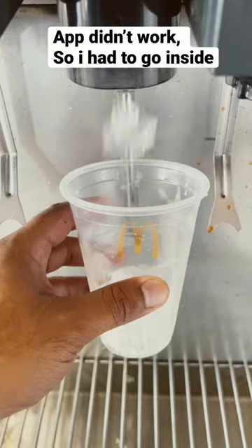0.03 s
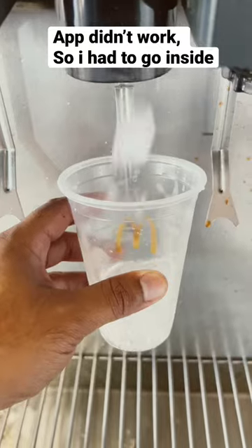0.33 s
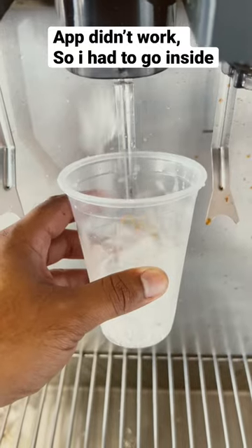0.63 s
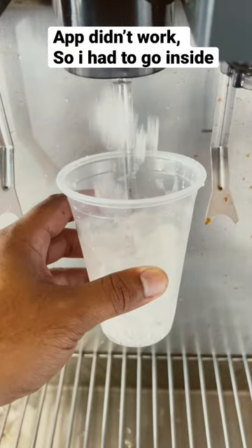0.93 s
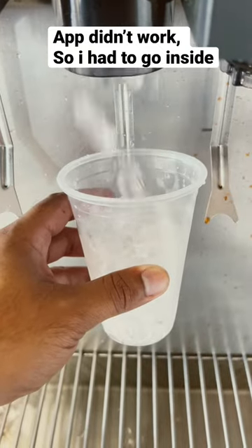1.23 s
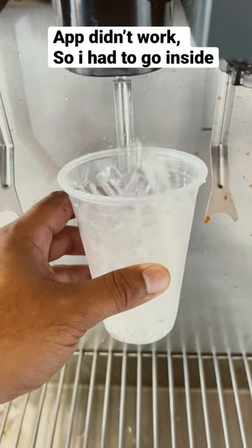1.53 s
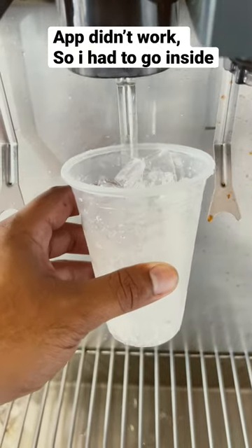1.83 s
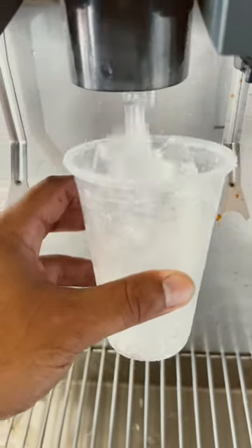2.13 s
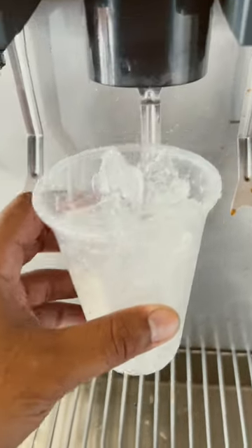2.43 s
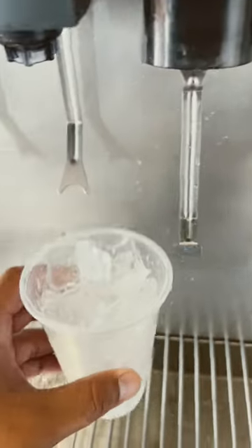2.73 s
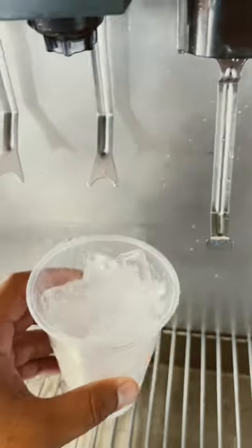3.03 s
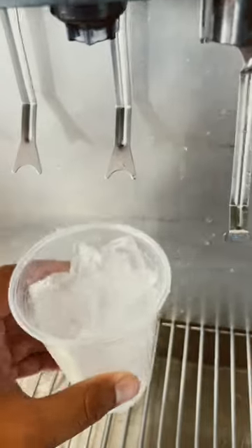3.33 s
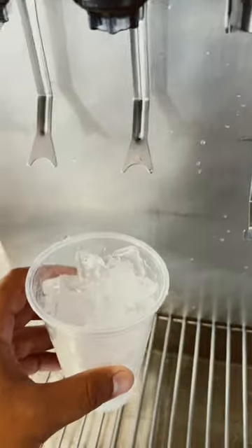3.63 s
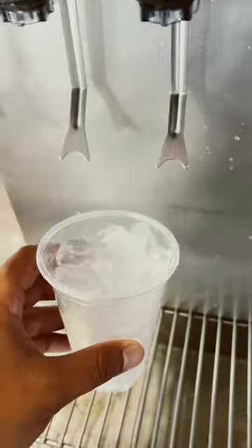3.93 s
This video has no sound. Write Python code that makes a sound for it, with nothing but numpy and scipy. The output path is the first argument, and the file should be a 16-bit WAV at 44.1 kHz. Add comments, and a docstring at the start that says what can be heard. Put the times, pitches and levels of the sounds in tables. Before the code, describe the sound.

Ice cubes clatter into a plastic cup close by from the start, with hollow knocks and bright clinks over a low dispenser motor hum. The motor stops at about 2 seconds and the ice settles by 2.4. The cup is shaken at about 2.9, 3.4 and 3.8 seconds, the cubes crunching and knocking its wall, the middle shake softer. A faint kitchen rumble runs underneath.

```python
"""In a kitchen, a dispenser motor hums while ice cubes tumble down a chute into a plastic cup nearby.
The motor stops, the ice settles, and the cup is shaken three times: the cubes slide, knock the wall
and crunch back. Each touch of ice is a tiny burst of noise, and hard knocks make the cup ring.
The machine's steel recess throws back quick echoes, and the kitchen rumbles behind it all."""
import sys
import numpy as np
from scipy import signal
from scipy.fft import rfft, irfft
from scipy.io import wavfile

SR = 44100
rng = np.random.default_rng(int(sys.argv[2]) if len(sys.argv) > 2 else 0)


def unload_audio(sound):
    """Save the sound as a 16-bit wav file, at the path given as the first command line argument."""
    columns = np.transpose(np.atleast_2d(sound))
    # keep every value between -1 and 1, then stretch to whole-number steps
    steps = np.round(np.clip(columns, -1, 1) * 32767)
    wavfile.write(sys.argv[1], SR, steps.astype(np.int16))


N = 176400
TIME, HZ = np.arange(N) / SR, np.fft.rfftfreq(N, 1 / SR)
MOTOR_ON_S, MOTOR_OFF_S, MOTOR_RISE_S = 0.035, 1.955, 0.0024

# how loudly small pieces of ice jostle during the pour: t/s, level/dB
JOSTLE_LEVELS = [(.036, -38.5), (.07, -43.5), (.09, -33), (.45, -26), (.57, -34.5), (.67, -28),
                 (.715, -36.5), (.88, -28.5), (1.28, -27), (1.4, -31), (1.63, -34.5), (1.72, -45),
                 (1.85, -42.5), (1.88, -34.5), (2.0, -37), (2.14, -30), (2.25, -33.5), (2.31, -47),
                 (2.7, -69)]


def cubes(touches_per_s=1100, first_touch=1.2):
    """Each cube chatters against plastic and other ice; every touch is a dry crack of its own."""
    # cube hits: t/s, hollow body/dB, clack/dB, bright clink/dB
    hits = [(0.077, -29, -27, -24.5), (0.094, -20.5, -20.5, -22.5), (0.138, -37, -19.5, -43),
            (0.15, -14, -24, -25), (0.225, -26.5, -26.5, -23), (0.236, -18, -20.5, -31),
            (0.257, -25, -21, -19.5), (0.305, -33, -25, -17.5), (0.367, -39, -21, -14),
            (0.39, -31, -30, -30), (0.446, -34, -21.5, -19), (0.484, -21, -16, -24),
            (0.507, -31, -25.5, -27), (0.585, -25, -26.5, -26.5), (0.596, -20.5, -24, -27),
            (0.624, -25, -30.5, -27), (0.647, -41, -28, -39), (0.726, -20, -20.5, -25.5),
            (0.741, -21, -39, -44), (0.759, -30, -22.5, -26.5), (0.806, -41, -25.5, -21),
            (0.873, -34, -23.5, -23), (0.886, -26, -21, -21), (0.906, -20.5, -23.5, -20),
            (0.964, -36, -26.5, -21), (1.017, -28, -18, -29), (1.073, -24.5, -22.5, -25),
            (1.112, -37, -31.5, -42), (1.148, -31.5, -23.5, -48), (1.224, -38, -25.5, -20.5),
            (1.337, -32, -24.5, -41), (1.354, -27.5, -24.5, -41), (1.466, -26, -22.5, -22),
            (1.502, -24.5, -27.5, -22.5), (1.54, -30.5, -28, -22.5), (1.611, -42, -33, -17),
            (1.631, -27.5, -31.5, -25), (1.742, -26, -25.5, -21.5), (1.752, -27, -27.5, -47),
            (1.809, -32, -28.5, -48), (1.826, -35.5, -33.5, -34), (1.873, -28, -22.5, -19.5),
            (1.888, -25, -22.5, -42), (1.95, -37, -23.5, -23), (1.958, -26.5, -23, -42),
            (2.024, -33, -23, -19), (2.038, -21, -19, -32), (2.055, -25, -23.5, -40),
            (2.074, -46, -22, -29), (2.116, -29, -22, -21.5), (2.131, -23.5, -23, -23),
            (2.19, -29, -35, -27), (2.38, -44.5, -49, -61), (2.598, -44, -47.5, -58),
            (3.032, -45, -36, -42), (3.403, -40, -33, -26.5), (3.424, -44, -35.5, -27)]
    # pitch ranges of body, clack and clink: low/Hz, high/Hz
    bands = [(450, 1400), (1400, 6000), (6000, 16500)]
    # their t60, the time to fade by 60 dB: one touch/s, whole chatter/s
    fades = [(0.029, 0.072), (0.021, 0.075), (0.013, 0.076)]
    # tone of the ice: f/Hz, level/dB
    tone = [(60, -10.5), (350, 1), (800, -4), (2500, 3.5), (4500, -2.5), (6500, 2.5), (16000, -5.5)]
    out, t = np.zeros((2, N)), np.arange(SR // 16) / SR
    filters = [signal.butter(2, band, "bandpass", fs=SR) for band in bands]
    for start, *levels in hits:
        touches = rng.exponential(1, len(t)) * (rng.random(len(t)) < touches_per_s / SR)
        touches[0] = first_touch ** 2
        for db, (b, a), (ring_s, chatter_s) in zip(levels, filters, fades):
            chatter = touches * fade(t, chatter_s) ** 2
            power = signal.lfilter([1], [1, -fade(1 / SR, ring_s) ** 2], chatter)  # each touch dies away
            cracks = np.sqrt(power) * burst(t, np.inf, wide=0.79)
            add(out, start, amp(db) * struck(signal.lfilter(b, a, cracks)))
    return colour(out, read(tone))


def knocks():
    """The whole load of ice hits the thin wall and makes the cup ring."""
    # blows on the wall: t/s, level/dB, brightness/(dB per octave)
    blows = [(0.149, -22, 0), (2.825, -37.5, -4), (2.942, -23, -2), (2.948, -14, -2), (2.951, -9, 2.5),
             (3.377, -21.5, -2), (3.775, -26, 0), (3.838, -13.5, 2), (3.844, -10, -3), (3.851, -9.5, 1)]
    # notes the filled cup rings at: f/Hz, level/dB, t60/s
    cup_notes = [(337, -14, 0.026), (632.5, -10, 0.12), (830, -12, 0.03), (980, -9.5, 0.033),
                 (1195, -5.5, 0.022), (1392, -11, 0.05), (1547, 1, 0.028), (1740, 3, 0.013),
                 (2506, 0.5, 0.025), (3130, -2.5, 0.015), (4060, -10.5, 0.034)]
    out, t = np.zeros((2, N)), np.arange(SR // 8) / SR
    hz, db, t60 = np.transpose(cup_notes)
    crack_band = signal.butter(1, [500, 3800], "bandpass", fs=SR, output="sos")
    for start, strength_db, tilt_db in blows:
        pitches = hz * (1 + 0.0095 * rng.standard_normal(len(hz)))
        gains = amp(db + tilt_db * np.log2(hz / hz.mean()) + rng.standard_normal(len(hz)))
        tone = ring(t, pitches, gains * rng.choice([-1, 1], len(hz)), t60)
        crack = signal.sosfilt(crack_band, rng.standard_normal((2, len(t)))) * fade(t, t60=0.054)
        add(out, start, amp(strength_db) * struck(struck(tone) + 0.58 * struck(crack)))
    return out


def pitched_hits(t60=0.05):
    """Short pitched hits: hollow thuds on the cup wall, then one faint ice clink."""
    # hits with a clear note: t/s, f/Hz, level/dB
    hits = [(0.277, 1084, -17.5), (.356, 844, -19.5), (.39, 980, -17.5), (.546, 747, -22), (.648, 720, -18),
            (.666, 615, -23), (.68, 753, -24.5), (.88, 814, -20), (2.371, 2370, -39)]
    out, t = np.zeros((2, N)), np.arange(SR // 12) / SR
    for start, hz, db in hits:
        note = np.sin(2 * np.pi * hz * t) * fade(t, t60)
        impact = signal.lfilter(*signal.iirpeak(hz, 1, fs=SR), burst(t, t60, wide=0.63))
        add(out, start, amp(db) * struck(note + 0.5 * struck(impact)))
    return out


def snaps(ping_hz=8900):
    """A cube cracks: one very short bright click with a high ring."""
    # cracks in the ice: t/s, level/dB
    cracks = [(.546, -24.5), (1.207, -18), (1.597, -21), (1.659, -15), (1.742, -25), (1.826, -25.5),
              (1.927, -27), (2.989, -20), (2.999, -23.5), (3.034, -36), (3.061, -36), (3.129, -47),
              (3.179, -37.5), (3.205, -49), (3.434, -28.5), (3.477, -45)]
    out, t = np.zeros((2, N)), np.arange(SR // 20) / SR
    for start, db in cracks:
        crack = burst(t, t60=0.006, wide=0.11)
        ping = signal.lfilter(*signal.iirpeak(ping_hz, 8, fs=SR), crack)
        click = signal.lfilter(*signal.butter(2, 5500, "highpass", fs=SR), crack)
        add(out, start, amp(db) * struck(struck(ping) + 2.2 * struck(click)))
    return out


def slide():
    """Cubes crunch over each other as the cup is shaken."""
    # one loudness curve for each shake: t/s, level/dB
    shakes = [
        [(2.82, -53), (2.89, -34.5), (2.94, -30), (2.975, -18.5), (3.015, -38), (3.11, -58)],
        [(3.31, -53), (3.36, -40.5), (3.41, -36), (3.45, -53), (3.5, -58)],
        [(3.715, -47.5), (3.74, -39), (3.79, -23.5), (3.825, -29), (3.85, -21.5), (3.9, -22.5), (3.94, -38.5),
         (4, -50)],
    ]
    # tone of sliding ice: f/Hz, level/dB
    tone = [(150, -14), (420, -2.5), (620, 0.5), (850, -8), (1700, 0), (3000, -4.5), (8500, -6.5),
            (16000, -16)]
    crunch = grains(tone, per_s=900, spread_db=0.5, t60=0.0098, wide=0.96)
    return sum(level(shake) for shake in shakes) * crunch


def jostle(wide):
    """Small pieces of ice bump together in a steady patter."""
    # tone of the pieces: f/Hz, level/dB
    tone = [(150, -15), (280, -5.5), (750, -4.5), (1250, -9), (2400, -4), (4200, -10), (6400, -8),
            (16000, -13.5)]
    return grains(tone, per_s=900, spread_db=3, t60=0.0082, wide=wide)


def roll(fall_db_per_s=6.5):
    """Cubes roll round the cup; the hollow rattle fades as it fills."""
    hollow = signal.lfilter(*signal.butter(2, [586, 1177], "bandpass", fs=SR), jostle(wide=0.99))
    return level(JOSTLE_LEVELS) * amp(-6.5 - fall_db_per_s * TIME) * unit(hollow)


def chute(x, sharpness=18.8):
    """The chute and recess boost the pitches they ring at."""
    # boosted pitches: f/Hz, boost/dB
    peaks = [(630, 2.3), (930, 6.3), (1066, 7.2), (1362, 3.9), (1580, 7), (1745, 0.37), (2520, 1.6)]
    return colour(x, sum(db / (1 + (2 * sharpness * (HZ / hz - 1)) ** 2) for hz, db in peaks))


def recess(x, echo_sets=7, drawn_out_s=2.3):
    """Quick, ever-shifting echoes off the steel walls weaken as the cup is drawn out."""
    echo_set = np.arange(N) // (SR // 40) % echo_sets  # the next set every 25 ms
    sent = x * amp(-7 * np.clip((TIME - drawn_out_s) / 0.5, 0, 1))
    return sum(echoes(sent * (echo_set == k), t60=0.043, delay_s=0.0008, per_s=2500)
               for k in range(echo_sets))


def motor(hum_hz=120.2, sag_db_per_s=1.0):
    """Electric hum and gear rumble start and stop quickly; a weak boom lingers in the room."""
    # tone of the gears: f/Hz, level/dB
    gear_tone = [(30, -33), (70, -16.5), (130, -7), (230, 2.5), (600, -16.5), (1500, -31)]
    since_off = np.maximum(TIME - MOTOR_OFF_S, 0)
    boom = amp(-8) * fade(since_off, t60=0.66)
    running = switch_on() * np.maximum(fade(since_off, t60=0.055), boom)
    phase = 2 * np.pi * hum_hz * TIME + 0.16 * drift(2.1)
    hum = np.sqrt(2) * (amp(-28.3) * np.sin(phase) + amp(-44.5) * np.sin(2 * phase))
    hum *= amp(drift(22))  # the level flutters
    gears = amp(-37.5) * noise(gear_tone)
    return running * amp(-sag_db_per_s * TIME) * (hum + gears)


def kitchen():
    """Machines in the background rumble, drone and briefly whine."""
    # faint thin whines: start/s, end/s, f/Hz, level/dB
    whines = [(2.3, 2.445, 2910, -51), (2.423, 2.87, 3220, -60.5)]
    # steady drones: f/Hz, level/dB
    drones = [(271, -55), (382, -60), (553, -61)]
    # tone of the rumble: f/Hz, level/dB
    rumble_tone = [(20, -32), (50, -0.5), (80, 1), (190, -7.5), (300, -5.5), (580, -14.5), (800, -24),
                   (3000, -28), (16000, -52)]
    out = np.zeros(N)
    for start, end, hz, db in whines:
        swell = np.clip(np.minimum(TIME - start, end - TIME) / 0.053, 0, 1)
        out += amp(db) * np.sin(2 * np.pi * hz * TIME) * swell
    for hz, db in drones:
        out += amp(db) * np.sqrt(2) * np.sin(2 * np.pi * hz * TIME + drift(2.6))
    rumble = amp(-44.5 + drift(7.3)) * noise(rumble_tone)
    return (out + rumble) * switch_on()


def two_ears(x, mono_below_hz=460):
    """Both ears get the same bass; the ice is one sample earlier on the right and louder on the left."""
    # extra loudness on the left: f/Hz, level/dB
    left_lead = [(330, 0), (680, 5.5), (1200, 1), (6000, 0)]
    left, right = np.roll(x[0], 1), x[1]
    middle = (left + right) / 2
    side = signal.lfilter(*signal.butter(2, mono_below_hz, "highpass", fs=SR), (left - right) / 2)
    lead_db = read(left_lead) / 2
    return np.vstack([colour((middle + sign * side)[None], sign * lead_db) for sign in (1, -1)])


def echoes(x, t60, delay_s, per_s):
    """Scattered, fading echoes, different at each ear."""
    t = np.arange(SR // 2) / SR
    taps = rng.choice([-1, 1], (2, len(t))) * (rng.random((2, len(t))) < per_s / SR)
    taps = taps * fade(t, t60) * (t > delay_s)
    taps /= np.linalg.norm(taps, axis=1, keepdims=True) + 1e-9
    return signal.fftconvolve(x, taps, axes=1)[:, :N]


def grains(spectrum, per_s, spread_db, t60, wide, count=90):
    """A dense patter of tiny dry ticks of uneven size."""
    t = np.arange(SR // 64) / SR
    sizes = amp(spread_db * np.minimum(rng.exponential(1, N), 3))
    sizes *= (rng.random(N) < per_s / SR) * rng.choice([-1, 1], N)
    kind = rng.integers(0, count, N)
    ticks = [burst(t, t60, wide) for _ in range(count)]
    out = np.zeros((2, N + len(t)))
    for at in np.flatnonzero(sizes):
        out[:, at:at + len(t)] += sizes[at] * ticks[kind[at]]
    return unit(colour(out[:, :N], read(spectrum)))


def burst(t, t60, wide):
    """Fading noise; `wide` sets how much the two ears differ."""
    return (rng.standard_normal(len(t)) + wide * rng.standard_normal((2, len(t)))) * fade(t, t60)


def ring(t, hz, gains, t60, spread_radians=0.62):
    """Fading notes, each reaching the two ears slightly out of step."""
    shift = spread_radians * rng.standard_normal(len(hz)) / 2
    notes = gains[:, None] * fade(t, t60[:, None]) * np.exp(2j * np.pi * hz[:, None] * t)
    return (np.exp(1j * np.outer([1, -1], shift)) @ notes).imag


def noise(spectrum):
    """Stereo noise with a given tone, nearly the same at both ears in the bass."""
    # how alike the two sides are: f/Hz, likeness/(0 to 1)
    likeness = [(150, .998), (320, .95), (700, .35), (1500, .1)]
    left, other = rfft(rng.standard_normal((2, N)))
    same = read(likeness)
    right = same * left + np.sqrt(1 - same ** 2) * other
    return unit(irfft(np.array([left, right]) * amp(read(spectrum)), N))


def drift(rate_hz):
    """A slow random wobble of typical size 1."""
    return unit(irfft(rfft(rng.standard_normal(N)) / (1 + (HZ / rate_hz) ** 4), N))


def colour(x, db):
    """Turns each frequency up or down by the given decibels."""
    log_gain = irfft(np.log(amp(db[::20])))
    half = len(log_gain) // 2
    fold = 2. * (np.arange(2 * half) < half)  # ringing comes only after a hit, never before
    fold[0] = 1
    response = irfft(np.exp(rfft(log_gain * fold)))
    return signal.oaconvolve(x, response[None, :half], axes=1)[:, :N]


def read(points):
    """Joins a table's points into a curve over frequency, on a log axis."""
    hz, value = np.transpose(points)
    return np.interp(np.log(HZ + 1), np.log(hz + 1), value)


def level(points):
    """A decibel curve over time as gain, silent outside it."""
    return amp(np.interp(TIME, *np.transpose(points), left=-120, right=-120))


def switch_on():
    """A quick rise from 0 to 1 as the motor starts."""
    return np.clip((TIME - MOTOR_ON_S) / MOTOR_RISE_S, 0, 1)


def fade(t, t60):
    """Falls by 60 dB every t60 seconds."""
    return amp(-60 * t / t60)


def amp(db):
    """Decibels to gain."""
    return 10 ** (np.asarray(db) / 20)


def unit(x):
    """Scales to an average power of 1."""
    return x / np.sqrt(np.mean(x ** 2) + 1e-20)


def struck(x):
    """Scales a blow so that its first 8 ms have the power of a sine of height 1."""
    return x / np.sqrt(2 * np.mean(x[:, :353] ** 2) + 1e-20)


def add(mix, start, sound):
    """Mixes in a stereo sound at `start` seconds."""
    part = mix[:, max(round(start * SR), 0):][:, :sound.shape[1]]
    part += sound[:, :part.shape[1]]


def scene():
    """Ice and cup with their echoes, over the motor and the kitchen."""
    pieces = level(JOSTLE_LEVELS) * jostle(wide=0.6)
    shaking = slide()
    ice = chute(cubes() + pieces + roll()) + shaking + knocks() + pitched_hits() + snaps()
    steel = amp(-5) * recess(ice)
    room = amp(-15.5) * echoes(ice, t60=0.38, delay_s=0.0075, per_s=6000)
    return two_ears(ice + steel + room) + motor() + kitchen()


def record(dry):
    """Rounds off the highest peaks and cuts the treble above 15900 Hz."""
    rounded = dry / (1 + (dry / 0.95) ** 6) ** (1 / 6)
    treble_cut = signal.firwin(511, 15900, window=("kaiser", 9), fs=SR)
    return signal.oaconvolve(rounded, treble_cut[None], "same")


dry = scene()
out = record(dry)
unload_audio(out)
```